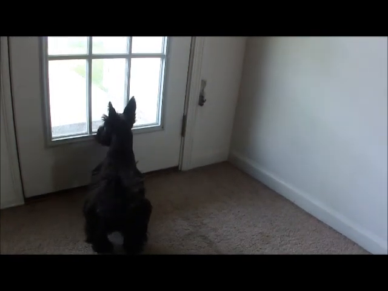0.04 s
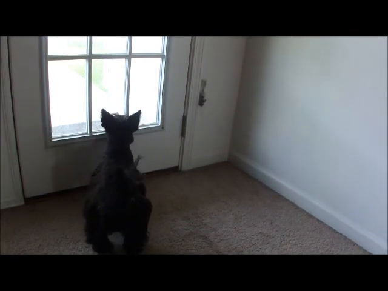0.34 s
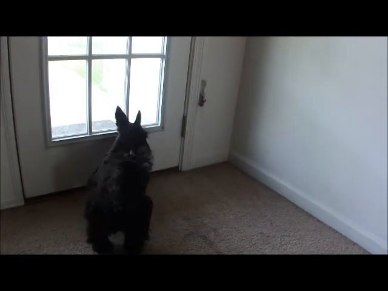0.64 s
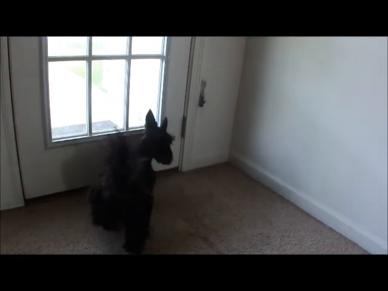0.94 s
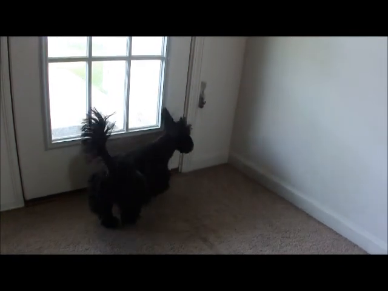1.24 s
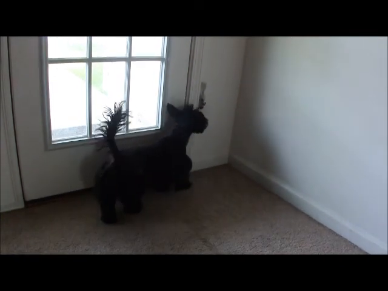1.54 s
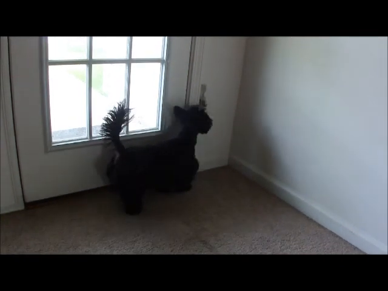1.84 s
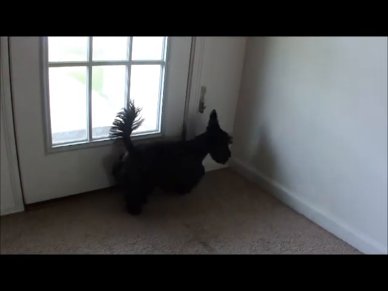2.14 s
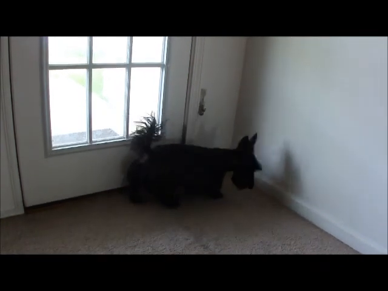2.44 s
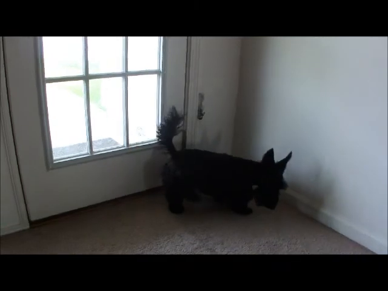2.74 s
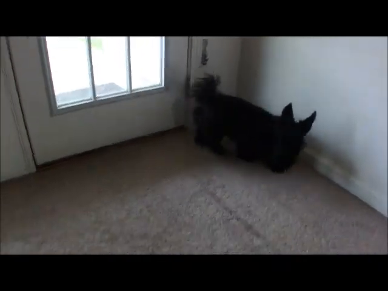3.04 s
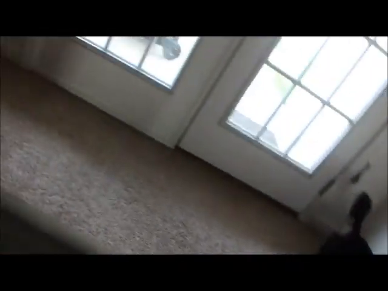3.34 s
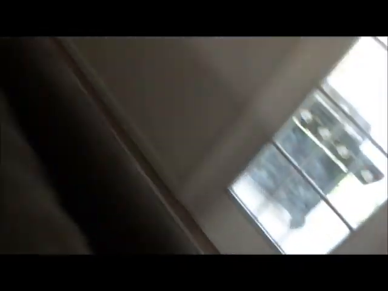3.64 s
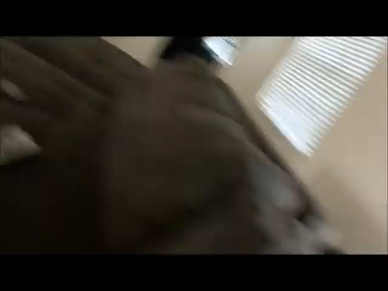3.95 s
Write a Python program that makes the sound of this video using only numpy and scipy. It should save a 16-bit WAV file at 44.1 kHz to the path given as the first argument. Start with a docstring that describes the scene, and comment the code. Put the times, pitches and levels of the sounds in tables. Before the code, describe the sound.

Little jingle bells ring brightly and tap a door panel indoors, over a steady ventilation hum. As they fade, sharp plastic clicks and a grainy rub come from a hand moving the camera, very close to the microphone.

```python
"""Three small jingle bells ring, swing and knock on a door panel as a dog nudges them.
Loose pellets strike and scrape the shells, and the shells clink together.
Then a camera is moved: its plastic case clicks and a hand rubs over it.
Steady ventilation hums in the room throughout: air noise plus motor tones."""
import sys
import numpy as np
from scipy import signal
from scipy.fft import rfft, irfft
from scipy.io import wavfile

SR = 44100
rng = np.random.default_rng(int(sys.argv[2]) if len(sys.argv) > 2 else 0)


def master(y):
    """Save y as 16-bit WAV."""
    cut = np.clip(np.atleast_2d(y).T, -1, 1)
    pcm = np.round(cut * 32767)  # scale
    wavfile.write(sys.argv[1], SR, pcm.astype(np.int16))


N = 176400
DOOR_LEFT_DB = -1.5  # left re right, bells and panel

# room noise: (frequency [Hz], left-right correlation [ratio])
ROOM_COHERENCE = [(60, 0.044), (250, 0.47), (900, 0.2), (2000, 0.53), (7000, 0.057), (15000, 0.11)]


def bells():
    """Pellet strikes ring three shells; scrape and clinks sit on top."""
    # (time [s], upper bell [dB], lower bell [dB], third bell [dB], brightness [dB/oct],
    #  t60 scale [ratio], scrape [dB])
    strikes = [(1.738, -31, -48, -60, -12, 1.1, -32), (1.7638, -32.5, -32, -54, 2, 1, -23),
               (1.778, -28, -53, -56, 1, 1.8, -22.5), (1.815, -42, -50, -38, 1, .8, -24),
               (1.866, -35, -49, -62, 6, 1, -25.5), (1.890, -42, -50, -65, 4, 0.88, -40),
               (1.9258, -48, -28.5, -54, 6, 0.7, -22.5), (1.938, -28, -33, -63, -25, 0.59, -29),
               (1.968, -47, -34, -57, 27.5, 0.73, -22), (2.003, -39, -29.5, -46, -22, 0.84, -21.5),
               (2.024, -48, -35, -54, -8, 0.6, -35), (2.050, -50, -53, -51, -4, 0.79, -26),
               (2.075, -45, -46, -60, 5, 1, -35), (2.098, -52, -32.5, -56, 1, 0.97, -29),
               (2.122, -52, -47, -57, 5, 1, -32), (2.1475, -49, -38, -65, 2, 1, -31),
               (2.175, -56, -58, -69, 1, 1, -44), (2.204, -55, -34.5, -73, 0, 1, -42),
               (2.228, -56, -48, -70, -6, 0.59, -36), (2.275, -60, -56, -70, 5, 1.5, -59),
               (2.389, -53, -44.5, -63, 13, 1.2, -40), (2.408, -55, -38, -70, -11, 0.63, -40),
               (2.445, -67, -61, -75, 0, 0.92, -54), (2.49, -60, -51, -75, 3, 1.4, -40)]
    # shell modes per bell: (frequency [Hz], level [dB], t60 [s])
    upper_modes = [(5643, -3, .28), (5700, -15, .2), (5750, -15, .18), (7978, -17, .25), (8202, -12, .2),
                   (8255, -11, .18), (8312, -13, .12), (9448, -13, .2), (13098, -30, .25)]
    lower_modes = [(5157, -20, .18), (5384, -3, .2), (5520, -15, .12), (7988, -11, .28), (8040, -21, .27),
                   (9344, -9.5, .11), (12690, -40, .2), (12817, -33, .22)]
    third_modes = [(4690, -10, .2), (4740, -7, .16), (7165, -8.5, .45), (9962, -3, .16)]
    times_s, *bell_db, bright_db_oct, t60_scale, scrape_db = np.transpose(strikes)
    tones = np.zeros(N)
    for modes, hit_db in zip([upper_modes, lower_modes, third_modes], bell_db):
        tones += shell(modes, list(zip(times_s, hit_db, bright_db_oct, t60_scale)))
    jingle = tones + pellets(times_s, scrape_db) + shell_clinks()
    return room(jingle, wet_db=-11, shared=0.33) * pan(DOOR_LEFT_DB)


def shell(modes, hits, swing_hz=35, chatter_hz=150):
    """Struck modes decay, sooner when touched; swinging and chattering contact make them flutter."""
    t, out = np.arange(N) / SR, np.zeros(N)
    for hz, mode_db, t60_s in modes:
        power = np.zeros(N)
        octaves = min(np.log2(hz / 5500), .75)
        for start_s, hit_db, bright_db_oct, t60_scale in hits:
            decay_db = 60 * t[:SR // 2] / (t60_s * t60_scale)
            add(power, start_s, amp(mode_db + hit_db + bright_db_oct * octaves - decay_db) ** 2)
        flutter = 1 + .8 * complex_wander(swing_hz) + .65 * complex_wander(chatter_hz)
        out += np.sqrt(power / 2) * unit((flutter * np.exp(2j * np.pi * hz * t)).real)
    return out


def pellets(times_s, levels_db, rise_s=.0025, scrape_s=.0095, rattle_s=.038, ticks_per_s=2500):
    """The loose pellet scrapes the shell at each strike, then rattles on."""
    # pellet on shell: (frequency [Hz], gain [dB])
    scrape_spectrum = [(2000, -35), (2900, -14), (3500, -1), (4000, -10), (4700, 1), (5800, 4.5),
                       (7500, 3.5), (10300, 1.5), (11200, -10), (11800, -40), (12900, -11), (13800, -18),
                       (15400, -8)]
    t, out = np.arange(SR // 4) / SR, np.zeros(N)
    attack = 1 - np.exp(-t / rise_s)
    for start_s, db in zip(times_s, levels_db):
        ticks = unit(rng.standard_normal(len(t)) * (rng.random(len(t)) < ticks_per_s / SR))
        rattle = amp(-17.5) * ticks * np.exp(-t / rattle_s)
        scrape = amp(-17) * rng.standard_normal(len(t)) * np.exp(-t / scrape_s)
        add(out, start_s, amp(db) * (scrape + rattle) * attack)
    return signal.oaconvolve(out, min_phase(lambda hz: lookup(scrape_spectrum, hz)))[:N]


def shell_clinks(decay_s=.007):
    """Shell hits shell: short bursts of high treble."""
    # contacts: (time [s], level [dB])
    contacts = [(1.739, -54), (1.778, -49), (1.858, -46), (1.9265, -38), (1.975, -45)]
    # (frequency [Hz], relative level [dB])
    clink_spectrum = [(8000, -30), (10500, -8), (12000, -22), (14500, -3), (15500, 0)]
    t, envelope = np.arange(SR // 4) / SR, np.zeros(N)
    for start_s, db in contacts:
        add(envelope, start_s, amp(db) * np.exp(-t / decay_s))
    return envelope * noise(clink_spectrum, ROOM_COHERENCE)[0]


def door_knocks(shake_s=.003, bounce_s=.00405, size=1024):
    """Bells hit the panel: a dull knock that shakes it, a weaker bounce, a faint ring."""
    # (time [s], knock gain [dB], tilt [dB/oct], ring gain [dB])
    knocks = [(1.768, -9.5, -6, -4), (1.8591, 0.5, -2, -6), (1.933, -10, 2, -6), (1.9794, 4.5, -2.5, 7),
              (2.0084, -13, -5, -8), (2.1163, -5.5, 3.5, -3), (2.386, -13.5, 3, -14)]
    # panel response: (frequency [Hz], gain [dB])
    panel_spectrum = [(100, -21), (350, -3), (650, 6.5), (1000, 11.5), (1900, 7), (2450, 6.5), (3000, -20),
                      (6000, -18), (12000, -46)]
    # (frequency [Hz], level [dB], t60 [s])
    panel_modes = [(1208, -42, .85), (1427, -45, .5), (2143, -54, .4), (2439, -54, .5)]
    t, out = np.arange(size) / SR, np.zeros(N)
    for start_s, db, tilt_db_oct, ring_db in knocks:
        shake = rng.standard_normal(size) * np.exp(-t / shake_s)
        force = (t == 0) + amp(-9) * shake / np.linalg.norm(shake)
        panel = min_phase(
            lambda hz: lookup(panel_spectrum, hz) + tilt_db_oct * np.log2(np.clip(hz, 300, 3000) / 1200))
        knock = amp(db) * np.convolve(force / np.linalg.norm(force), panel)
        add(out, start_s, knock)
        add(out, start_s + bounce_s, amp(-14.5) * knock)
        add(out, start_s, amp(ring_db) * ring(panel_modes))
    return room(out, wet_db=-3, shared=1.0) * pan(DOOR_LEFT_DB)


def case_clicks(snap_s=.0006, body_s=.0018, ring_s=.0024, left_lag_rad=1.4):
    """Plastic snaps close by; the case knocks and rings a few cycles, later on the left."""
    # (time [s], snap [dB], snap tilt [dB/oct], crack [dB], body knock [dB], ring [Hz])
    clicks = [(2.652, -35, -2, -65, -54, 1200), (2.7735, -35, 2, -62, -31, 1100),
              (2.7944, -21, 1, -23.5, -17, 780), (3.122, -35, 2, -65, -33, 1400),
              (3.2550, -6, 5, -50, -22.5, 1700), (3.313, -65, 0, -70, -22, 1400),
              (3.3246, -9.5, -6, -25.5, -12, 1370)]
    # parts of a click: (frequency [Hz], relative level [dB])
    crack_spectrum = [(2000, -15), (3500, -7), (4500, -3), (5700, 4), (7500, -1), (10000, 0), (12500, -4),
                      (15300, 1)]
    snap_spectrum = [(2000, -22), (3500, -26), (4900, -12), (5600, 5.5), (6200, 6), (7800, 5.5), (9300, 1),
                     (11000, -17), (12500, -28), (13800, -21), (15300, -13)]
    body_spectrum = [(40, -36), (120, -22), (250, -5), (500, -1), (900, 2.5), (1400, 3), (2100, 11),
                     (2700, 0), (3300, -22), (4400, -13), (6000, -16), (11000, -68)]
    t, out = np.arange(SR // 20) / SR, np.zeros((2, N))
    swell = np.exp(-t / ring_s) - np.exp(-t / snap_s)
    for start_s, snap_db, snap_db_oct, crack_db, body_db, ring_hz in clicks:
        body_db_oct = 11 * np.log2(ring_hz / 1000)
        tone = np.sin(2 * np.pi * ring_hz * t - np.array([[left_lag_rad], [0]]))
        add(out, start_s, amp(crack_db) * burst(crack_spectrum, 0, 7000, snap_s))
        add(out, start_s, amp(snap_db) * burst(snap_spectrum, snap_db_oct, 9400, snap_s))
        add(out, start_s, amp(body_db) * burst(body_spectrum, body_db_oct, 1150, body_s, shared=0.5))
        add(out, start_s, amp(body_db - 5) * swell / swell.max() * tone)
    return out * pan(left_db=-2)


def hand_rub():
    """A hand slides over the camera case: grainy rub, fine hiss."""
    # (time [s], rub [dB], hiss [dB])
    stroke = [(3.0, -69, -72), (3.11, -41, -58.5), (3.22, -44, -56), (3.31, -39.5, -68),
              (3.35, -35.5, -56.5), (3.55, -38.5, -53.5), (3.65, -31.5, -49.5), (3.74, -37, -45),
              (3.79, -39, -53), (3.83, -33.5, -51.5), (4.0, -40, -57)]
    # friction: (frequency [Hz], relative level [dB])
    rub_spectrum = [(40, -62), (130, -8), (300, -6), (600, 3), (1300, 1.5), (2100, -0.5), (2550, -13.5),
                    (3000, -30), (5000, -38), (10000, -71)]
    hiss_spectrum = [(2500, -10), (4800, -11.5), (5900, 3), (8300, 1.5), (10500, -6.5), (11800, -56),
                     (15500, -18)]
    t = np.arange(N) / SR
    times_s, rub_db, hiss_db = np.transpose(stroke)
    grain_db = 1.5 * wander(rate_hz=110)
    coherence = [(1, 0.72)]  # flat over frequency
    rub = noise(rub_spectrum, coherence) * amp(np.interp(t, times_s, rub_db, left=-100) + grain_db)
    hiss = noise(hiss_spectrum, coherence) * amp(np.interp(t, times_s, hiss_db, left=-100) + grain_db / 2)
    return rub + hiss


def ventilation(tone_width_hz=8.9):
    """Steady air noise with wavering motor tones."""
    # (frequency [Hz], relative density [dB])
    air_spectrum = [(25, -43), (60, -25.5), (100, -21), (170, -6), (290, 1.5), (420, 3.5), (750, 0),
                    (1100, -3.5), (1950, -4.5), (2450, -9), (2750, -23.5), (3000, -44.5), (3500, -25.5),
                    (4000, -46.5), (4500, -28.5), (5000, -41), (5800, -21), (8500, -24), (10500, -31),
                    (11100, -38), (11600, -91), (13700, -57), (14600, -39), (15800, -37)]
    # (frequency [Hz], level [dB])
    motor_tones = [(76, -80), (117, -68), (157, -64), (195, -56.5), (394, -51.5), (1868, -57.5),
                   (2385, -58.5)]
    out = noise(air_spectrum, ROOM_COHERENCE) * amp(-37 + .75 * wander(rate_hz=35))
    for hz, db in motor_tones:
        common, left, right = (narrowband(hz, tone_width_hz) for _ in range(3))
        out += amp(db) * unit(np.array([common + left, common + right]))
    return out * pan(left_db=-1.8)


def room(x, wet_db, shared, size=256):
    """Direct sound plus sparse reflections."""
    # room decay: (frequency [Hz], t60 [s])
    decay_times = [(200, 0.23), (1500, 0.4), (6000, 1), (14000, 0.46)]
    taps = rng.choice([-1., 1.], (3, SR // 2)) * (rng.random((3, SR // 2)) < .1)
    taps[:, :size // 2] = 0
    hz, t, spectra = signal.stft(taps, SR, nperseg=size)
    decay = np.exp(-np.log(1000) * t / lookup(decay_times, hz)[:, None])
    tail = stereo(signal.istft(spectra * decay, SR, nperseg=size)[1], shared)
    return x + amp(wet_db) * signal.fftconvolve(x[None], tail / np.linalg.norm(tail[0]), axes=1)[:, :N]


def ring(modes):
    """Decaying sines, random phase."""
    t = np.arange(SR) / SR
    return sum(amp(db) * np.exp(-np.log(1000) * t / t60_s) * np.sin(2 * np.pi * (hz * t + rng.random()))
               for hz, db, t60_s in modes)


def burst(spectrum, tilt_db_oct, pivot_hz, decay_s, shared=0.2, size=1024):
    """Decaying stereo noise puff, peak about 1."""
    t = np.arange(size) / SR
    band = min_phase(lambda hz: lookup(spectrum, hz) + tilt_db_oct * np.clip(np.log2(hz / pivot_hz), -1, 1))
    puffs = rng.standard_normal((3, size)) * np.exp(-t / decay_s)
    x = signal.fftconvolve(stereo(puffs, shared), band[None], axes=1)
    return x / np.linalg.norm(x, axis=1, keepdims=True) * np.sqrt(decay_s * SR) / 2


def noise(spectrum, coherence):
    """Shaped stereo noise, rms 1."""
    hz = np.fft.rfftfreq(N, 1 / SR)
    left, other = rfft(rng.standard_normal((2, N)))
    correlation = lookup(coherence, hz)
    right = correlation * left + np.sqrt(1 - correlation ** 2) * other
    return unit(irfft(np.array([left, right]) * amp(lookup(spectrum, hz)), N))


def narrowband(hz, width_hz):
    """Tone of random amplitude and phase."""
    phase = 2 * np.pi * hz * np.arange(N) / SR
    return wander(width_hz) * np.cos(phase) + wander(width_hz) * np.sin(phase)


def wander(rate_hz):
    """Smooth random signal, rms 1."""
    lowpass = np.exp(-(np.fft.rfftfreq(N, 1 / SR) / rate_hz) ** 2)
    return unit(irfft(rfft(rng.standard_normal(N)) * lowpass, N))


def complex_wander(rate_hz, size=4096):
    """Smooth random phasor, rms about 1."""
    white = rng.standard_normal(size) + 1j * rng.standard_normal(size)
    lowpass = np.exp(-(np.fft.fftfreq(size, N / SR / size) / rate_hz) ** 2)
    smooth = np.fft.ifft(np.fft.fft(white) * lowpass)
    return np.interp(np.arange(N) * size / N, np.arange(size), smooth / np.std(smooth))


def min_phase(gain_db, size=2048):
    """Minimum-phase impulse response for gain_db(hz)."""
    hz = np.fft.rfftfreq(size, 1 / SR) + 1
    cepstrum = irfft(np.log(amp(np.maximum(gain_db(hz), -90))))
    cepstrum[1:size // 2] *= 2
    cepstrum[size // 2 + 1:] = 0
    return irfft(np.exp(rfft(cepstrum)))[:size // 2]


def lookup(points, hz):
    """Interpolates over log frequency."""
    points_hz, values = np.transpose(points)
    return np.interp(np.log(hz + 1), np.log(points_hz + 1), values)


def stereo(rows, shared):
    """(left, right, common) to stereo; shared is the common power fraction."""
    return np.sqrt(shared) * rows[2] + np.sqrt(1 - shared) * rows[:2]


def pan(left_db):
    """Gains for a left-right level difference."""
    return amp([[left_db / 2], [-left_db / 2]])


def add(mix, start_s, sound):
    """Mixes in place."""
    part = mix[..., round(start_s * SR):][..., :sound.shape[-1]]
    part += sound[..., :part.shape[-1]]


def amp(db):
    """dB to gain."""
    return 10 ** (np.asarray(db) / 20)


def unit(x):
    """Scales to rms 1."""
    return x / np.sqrt(np.mean(x ** 2) + 1e-20)


def scene():
    """Stereo sum of all sources."""
    return bells() + door_knocks() + case_clicks() + hand_rub() + ventilation()


def record(dry):
    """Low-pass at 16.1 kHz."""
    lowpass = signal.firwin(255, 16100, window=("kaiser", 9), fs=SR)
    return signal.oaconvolve(dry, lowpass[None], "same")


dry = scene()
out = record(dry)
master(out)
```